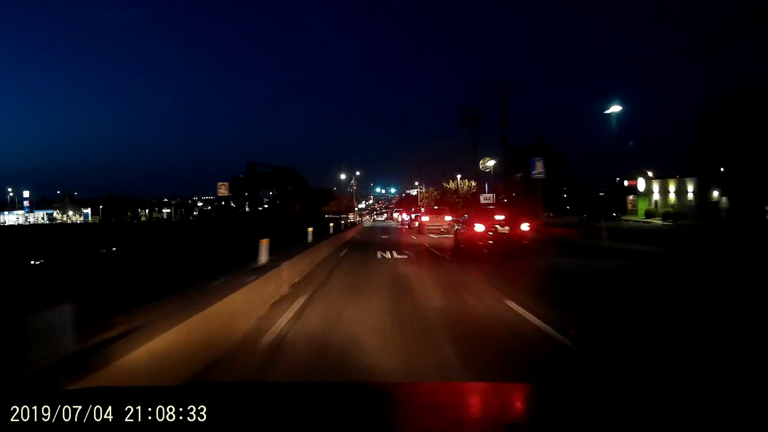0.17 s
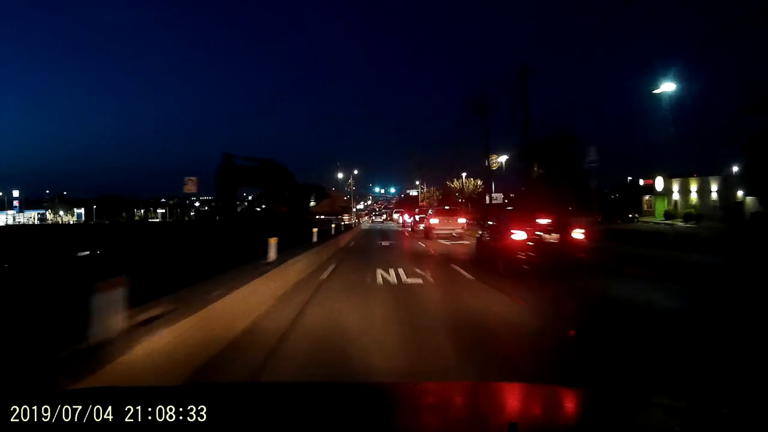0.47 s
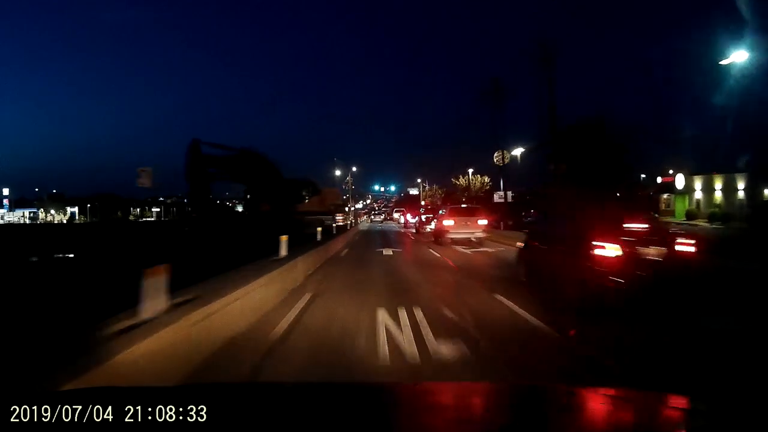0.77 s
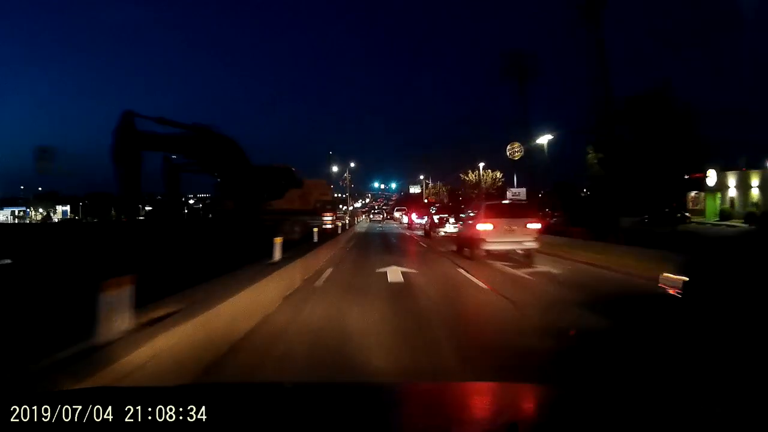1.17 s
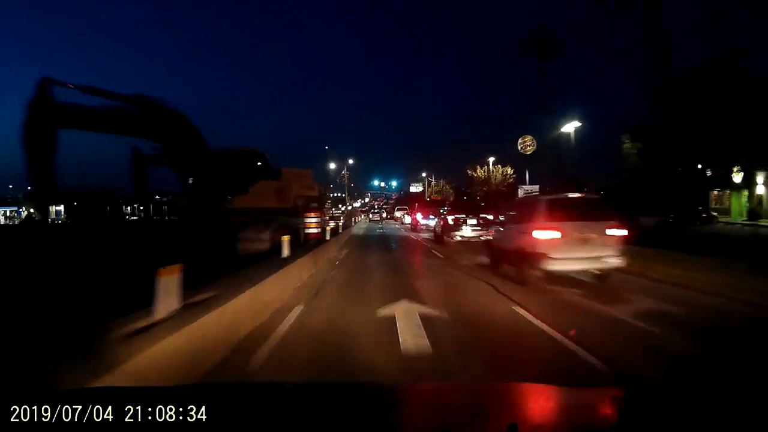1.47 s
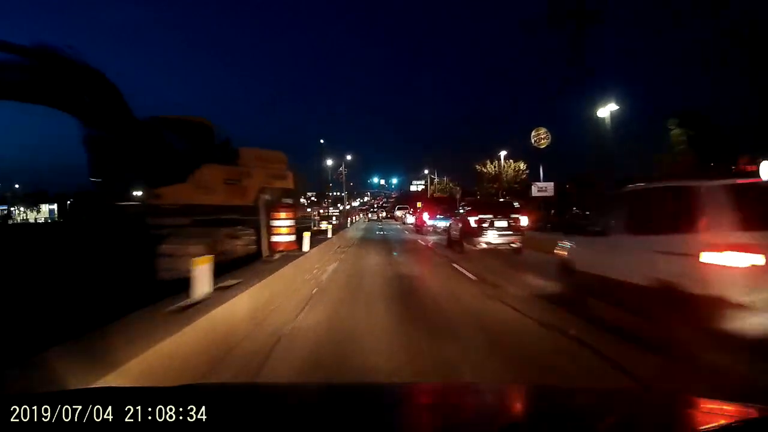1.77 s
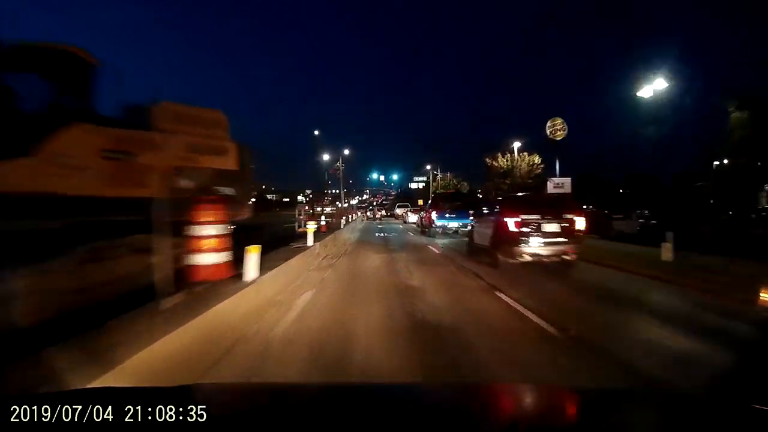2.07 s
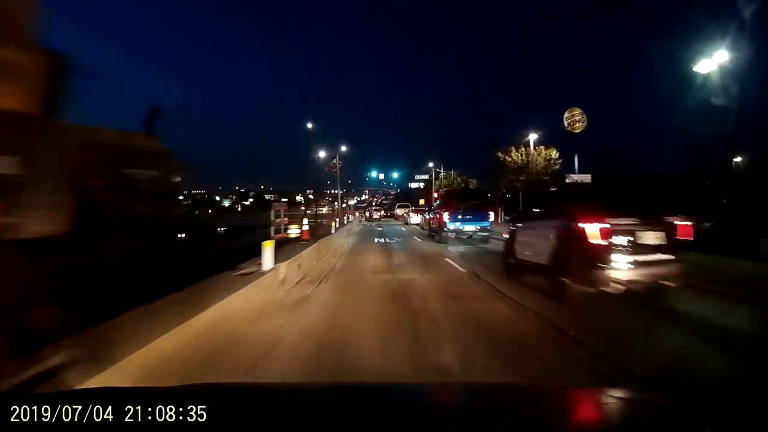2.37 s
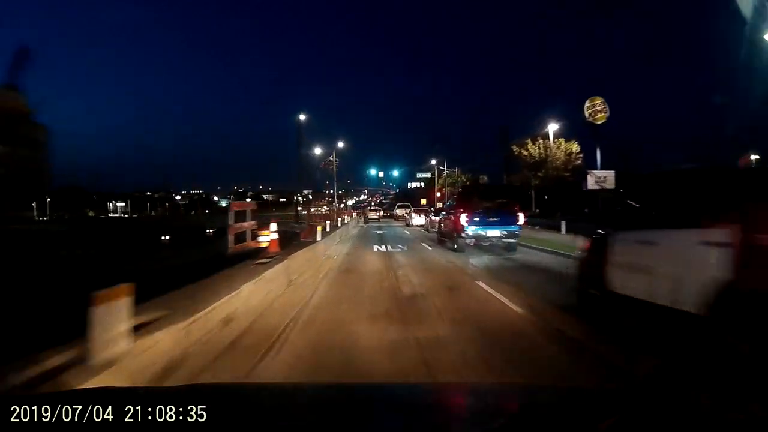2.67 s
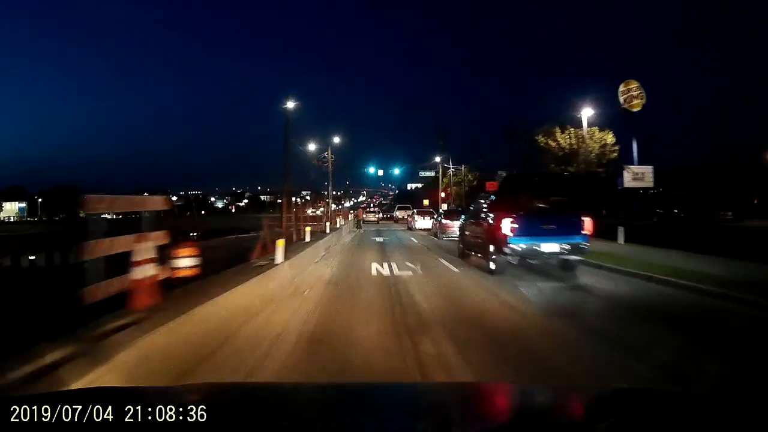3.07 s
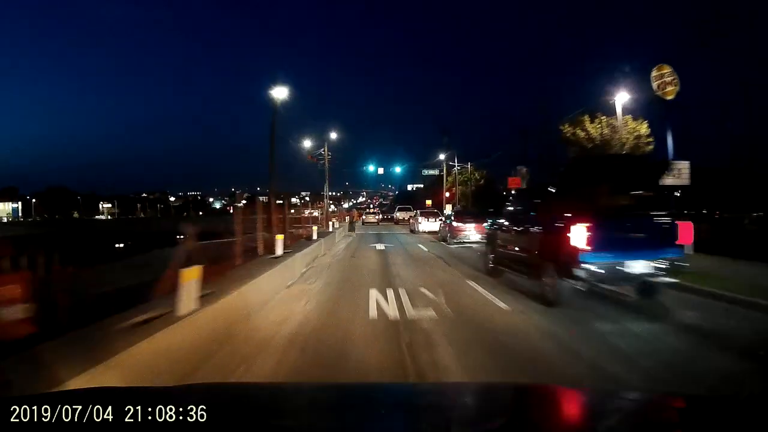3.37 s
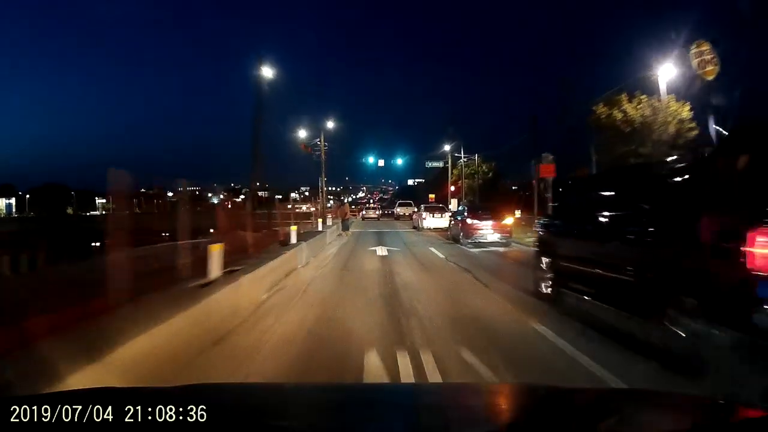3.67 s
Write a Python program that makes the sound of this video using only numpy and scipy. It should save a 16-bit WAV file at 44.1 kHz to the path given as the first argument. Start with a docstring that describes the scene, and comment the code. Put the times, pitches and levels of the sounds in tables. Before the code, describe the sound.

Low engine and road rumble inside a moving car, dark and bassy. The engine booms strongest around 0.3 s, then sinks in pitch and fades as the car slows. Muffled tyre roar runs throughout, easing slightly. Soft seam thumps come near 0.7, 1.1, 1.9 and 3.2 s, with deep heaves around 0.9, 1.6, 2.9 and 3.6. From 1.5 s a wavering low drone descends. Faint microphone hiss; one barely audible trim tick near 0.9.

```python
"""Engine firing note inside a slowing car: a sine that booms, then sinks in pitch and level.
A drivetrain drone, also a sine, swells and falls in pitch as the car coasts.
Tyres on asphalt: shaped noise for the roar, narrow noise bands for tyre and cabin resonances.
Seams thump as short bursts of sines, dips boom low, trim chirps once as a noise burst; the microphone hisses."""
import sys
import numpy as np
from scipy import signal
from scipy.fft import rfft, irfft
from scipy.io import wavfile

SR = 44100
rng = np.random.default_rng(int(sys.argv[2]) if len(sys.argv) > 2 else 0)


def master_out(mix):
    """Clip the mix to full scale and print it as 16-bit PCM to the path in sys.argv[1]."""
    frames = np.transpose(np.atleast_2d(mix))
    ceiling = np.clip(frames, -1, 1)
    pcm = np.round(ceiling * 32767).astype(np.int16)
    wavfile.write(sys.argv[1], SR, pcm)


N = 168021
TIME = np.arange(N) / SR
FREQS = np.maximum(np.arange(N // 2 + 1) * SR / N, 1)  # Hz; DC raised to 1 Hz for logs and ratios

# Microphone hiss spectrum: (frequency [Hz], relative density [dB])
HISS_SPECTRUM = [(1000, 2.5), (4000, 1), (7000, 0.8), (11000, 1), (14500, 0.7), (16000, -5)]
HISS_DB_RMS = -70

# Trim chirp
CHIRP_S, CHIRP_LENGTH_S = .891, .0038
CHIRP_HZ, CHIRP_WIDTH_HZ, CHIRP_PEAK_DB_RMS = 3510, 220, -64

# Road dips that heave the body: (time [s], peak level [dB rms], bell length [s])
ROAD_DIPS = [(.85, -37, .045), (1.584, -31.5, 0.047), (2.936, -35.5, 0.018), (3.6, -37, .05)]
HEAVE_HZ = 36

# Seams under the tyres: (time [s], level [dB], bell length [s])
ROAD_SEAMS = [(0.681, -36.5, .009), (.785, -43, 0.0091), (1.057, -40.5, 0.022), (1.325, -42, 0.0096),
              (1.891, -32.5, .011), (2.8, -46, 0.013), (3.231, -40, 0.0086)]
# Modes a seam rings: (frequency [Hz], level re seam [dB])
SEAM_MODES = [(280, -14), (350, 0), (460, -6), (580, -11), (680, -20), (1000, -19.5), (1190, -26)]
MODE_SCATTER_DB = .5

# Tyre roar spectrum through the body: (frequency [Hz], relative density [dB])
ROAR_SPECTRUM = [(12, -23), (26, -14), (52, -6), (75, 0), (115, -4), (180, -7), (250, -5), (330, -10.5),
                 (410, -13.5), (580, -16), (880, -22), (1150, -26.5), (1450, -31), (1800, -38.5),
                 (2400, -43), (2750, -51.5), (4000, -58.5), (8000, -70)]
# Tyre and cabin resonances shaken by the road:
# (frequency [Hz], width [Hz], level at 0 dB rolling [dB rms], gain per dB of rolling [dB/dB])
ROAD_RESONANCES = [(38.7, 17, -37.5, 1), (90.7, 36, -48.5, 0.5), (139.1, 12.6, -48, -1.1),
                   (285.3, 34.6, -46, 1.5), (329, 40, -58.5, 4.5), (470.5, 39, -52.5, 0),
                   (483.2, 10, -54.5, 1.5), (570, 22, -64, -0.2), (665, 90, -65.5, 7.5), (983, 47, -62, 1),
                   (1091, 44, -62, 1.5), (1240, 38, -75.5, 6), (2230, 270, -77.5, 0.5),
                   (3310, 370, -82.5, 1)]
# Rolling strength, lower overall as speed falls: (time [s], level [dB])
ROLLING_STRENGTH = [(0, 1.5), (.5, 1.5), (1.2, 0.84), (1.7, 0.5), (2.0, 1.16), (2.45, -.3), (2.7, -1),
                    (3.1, -1.1), (3.8, -1)]
ROAR_DB_RMS = -39.5  # at 0 dB rolling, before flicker
FLICKER_DB, FLICKER_HZ = .5, 26
BASS_SHARE, BASS_EDGE_HZ = .2, 210  # roar bass takes this share of the rolling changes

# Drivetrain drone: (time [s], pitch [Hz], level before waver [dB rms])
DRONE_CURVE = [(1.3, 239, -71), (1.5, 238, -50), (1.66, 236, -46.5), (1.78, 234, -44.5), (2.25, 223, -40.5),
               (2.55, 215, -44.5), (2.95, 208, -42.5), (3.25, 207, -46.5), (3.8, 201, -52.5)]
DRONE_WAVER_DB, DRONE_WAVER_HZ = 3.26, 7.1

# Engine firing pitch: (time [s], pitch [Hz])
FIRING_PITCH = [(0, 54), (.7, 54.5), (1.44, 51.46), (1.7, 49.5), (2.1, 48.26), (2.9, 42.83), (3.8, 37.77)]
# Engine firing level: (time [s], level [dB rms])
FIRING_LEVEL = [(0, -33.5), (.27, -28.5), (.65, -31.5), (.92, -36.5), (1.38, -33), (1.62, -46.5),
                (2.15, -37), (2.8, -42), (3.8, -47)]

# Recording
START_S, OPEN_S, FADE_S = .036, .0005, .004
CUTOFF_HZ = 15800


def from_db(db):
    """Decibels to amplitude gain."""
    return 10 ** (np.asarray(db) / 20)


def rms_one(x):
    """Scale to unit rms."""
    return x / np.sqrt(np.mean(x ** 2) + 1e-20)


def in_time(rows):
    """Interpolate each column after the time column to every sample."""
    s, *columns = np.transpose(rows)
    return [np.interp(TIME, s, column) for column in columns]


def noise(gain):
    """Random-phase noise with the given gain per frequency; rms 1."""
    phases = 2 * np.pi * rng.random(len(FREQS))
    return rms_one(irfft(gain * np.exp(1j * phases), N))


def colour(points):
    """Gain per frequency through spectrum points, on a log frequency axis."""
    hz, db = np.transpose(points)
    return from_db(np.interp(np.log(FREQS), np.log(hz), db))


def resonance(hz, width_hz):
    """Gain per frequency of a resonance applied twice, for steep skirts."""
    detuning = (FREQS ** 2 - hz ** 2) / (FREQS * width_hz * np.pi / 2)
    return 1 / (1 + detuning ** 2)


def drift(rate_hz):
    """Slow random signal; rms 1."""
    return noise(1 / (1 + (FREQS / rate_hz) ** 2))


def swell(s, length_s):
    """Bell envelope around time s; length is its standard deviation."""
    return np.exp(-.5 * ((TIME - s) / length_s) ** 2)


def tone(hz):
    """Sine of rms 1 that follows a pitch, from a random phase."""
    cycles = np.cumsum(hz * np.ones(N)) / SR + rng.random()
    return np.sqrt(2) * np.sin(2 * np.pi * cycles)


def microphone_hiss():
    """Steady coloured noise of the microphone."""
    return from_db(HISS_DB_RMS) * noise(colour(HISS_SPECTRUM))


def trim():
    """Rubbing plastic excites a narrow band for one tiny chirp."""
    band = noise(resonance(CHIRP_HZ, CHIRP_WIDTH_HZ))
    return from_db(CHIRP_PEAK_DB_RMS) * swell(CHIRP_S, CHIRP_LENGTH_S) * band


def heaves():
    """Road dips set the body's lowest mode booming briefly."""
    return sum(from_db(db) * swell(s, length_s) * tone(HEAVE_HZ) for s, db, length_s in ROAD_DIPS)


def seams():
    """Each seam strikes the thump modes a little differently; they swell and fade together."""
    out = np.zeros(N)
    for s, db, length_s in ROAD_SEAMS:
        near = np.abs(TIME - s) < .1
        shape = swell(s, length_s)[near]
        for hz, mode_db in SEAM_MODES:
            scatter_db = MODE_SCATTER_DB * rng.standard_normal()
            gain = np.sqrt(2) * from_db(db + mode_db + scatter_db)
            out[near] += gain * shape * np.sin(2 * np.pi * (hz * TIME[near] + rng.random()))
    return out


def tyres():
    """Asphalt texture drives a broad roar and the resonances of tyres and cabin."""
    rolling_db, = in_time(ROLLING_STRENGTH)
    flicker_db = FLICKER_DB * drift(FLICKER_HZ)
    roar = from_db(ROAR_DB_RMS) * noise(colour(ROAR_SPECTRUM))
    bass_gain = 1 / (1 + (FREQS / BASS_EDGE_HZ) ** 2) ** 2
    bass = irfft(rfft(roar) * bass_gain, N)
    out = from_db(BASS_SHARE * rolling_db) * bass
    out += from_db(rolling_db + flicker_db) * (roar - bass)
    for hz, width_hz, db, follows in ROAD_RESONANCES:
        level_db = db + follows * rolling_db
        if hz > BASS_EDGE_HZ:  # only these flicker
            level_db = level_db + flicker_db
        out += from_db(level_db) * noise(resonance(hz, width_hz))
    return out


def drivetrain():
    """Clean drone that sinks with road speed, its level wavering."""
    hz, db = in_time(DRONE_CURVE)
    return from_db(db + DRONE_WAVER_DB * drift(DRONE_WAVER_HZ)) * tone(hz)


def engine():
    """Firing note booms in the cabin and fades as the throttle closes."""
    hz, = in_time(FIRING_PITCH)
    db, = in_time(FIRING_LEVEL)
    return from_db(db) * tone(hz)


def scene():
    """Sum of the sources as heard at the windscreen, one channel."""
    return (trim() + heaves() + seams() + tyres() + drivetrain() + engine())[None]


def record(dry):
    """Add hiss, open just after the start, close at the end, cut the top."""
    opening = np.clip((TIME - START_S) / OPEN_S, 0, 1)
    closing = np.clip((TIME[-1] - TIME) / FADE_S, 0, 1)
    gated = opening * closing * (dry + microphone_hiss())
    # order 10, ripple .1 dB, stopband 80 dB down
    lowpass = signal.ellip(10, .1, 80, CUTOFF_HZ, fs=SR, output="sos")
    return signal.sosfilt(lowpass, gated)


dry = scene()
out = record(dry)
master_out(out)
```